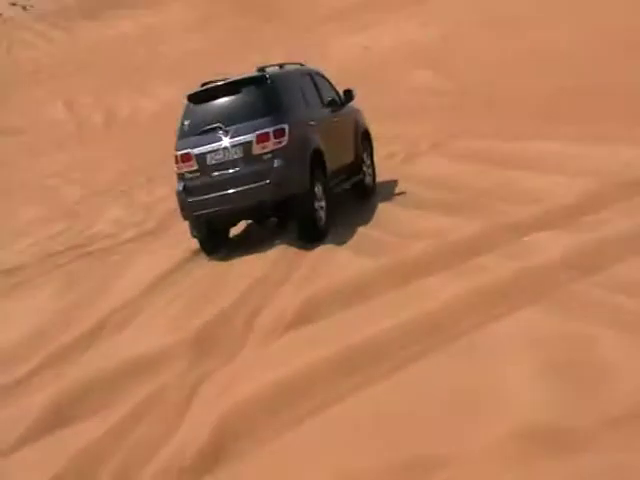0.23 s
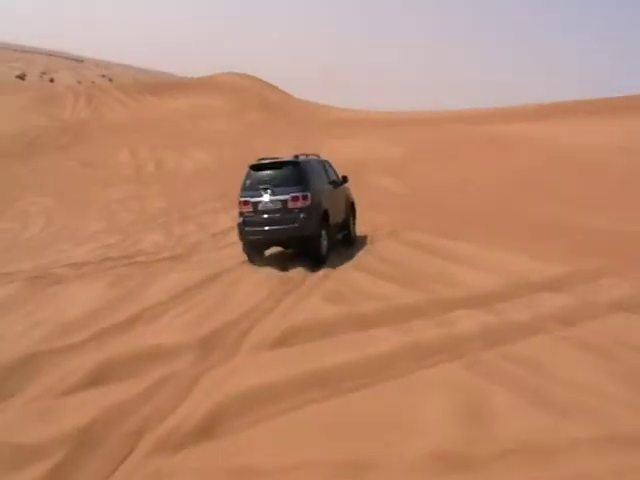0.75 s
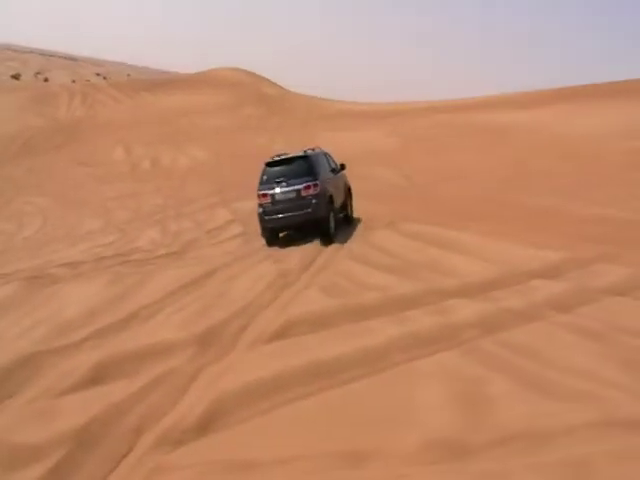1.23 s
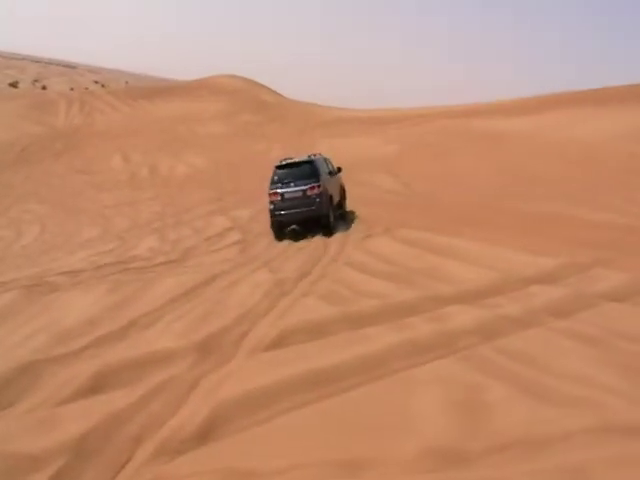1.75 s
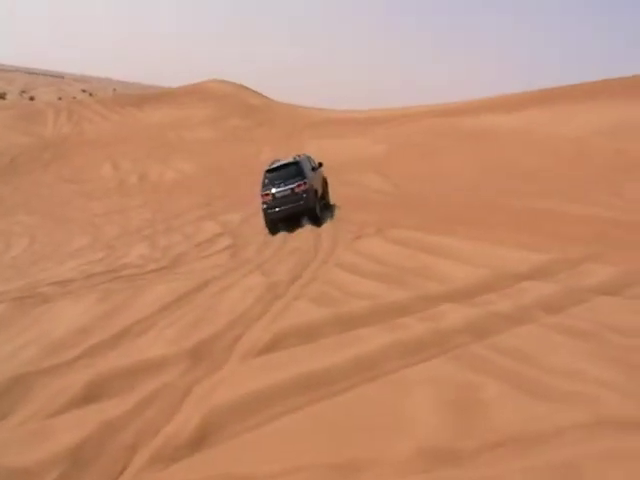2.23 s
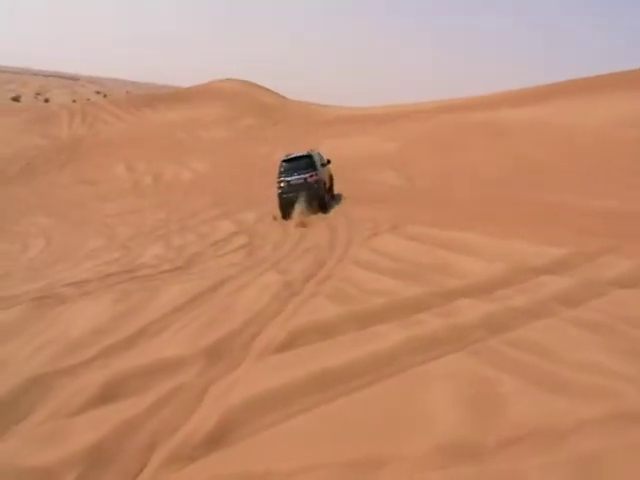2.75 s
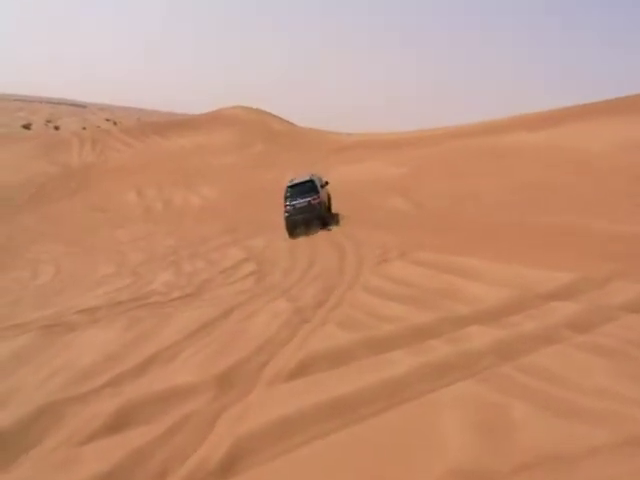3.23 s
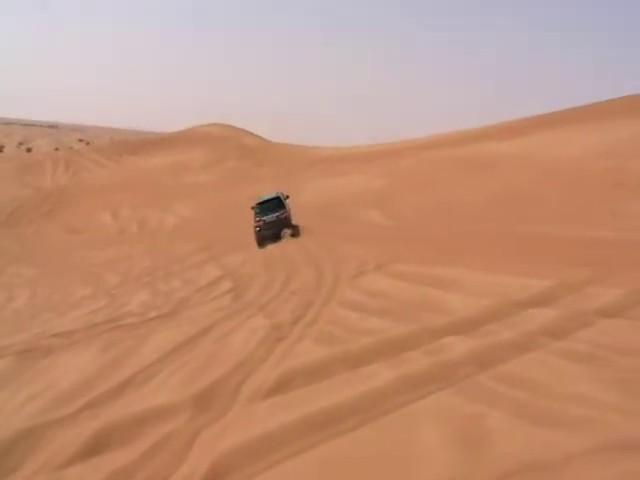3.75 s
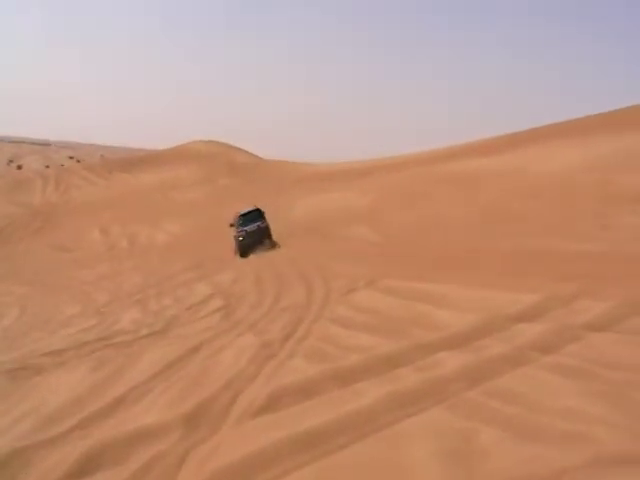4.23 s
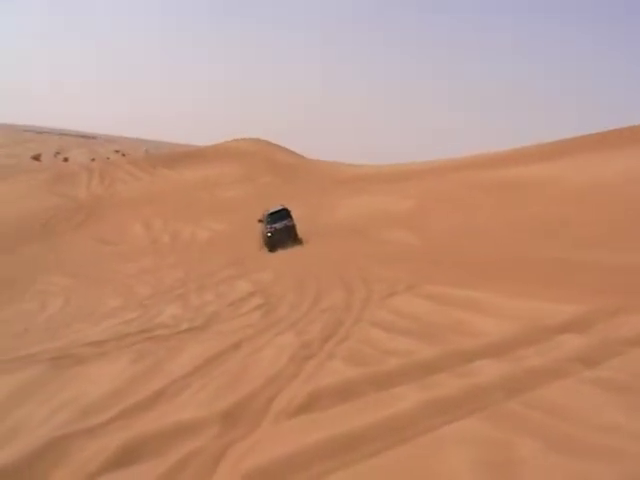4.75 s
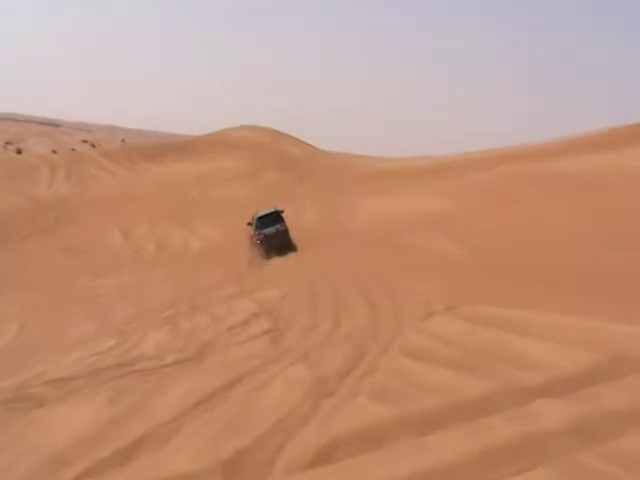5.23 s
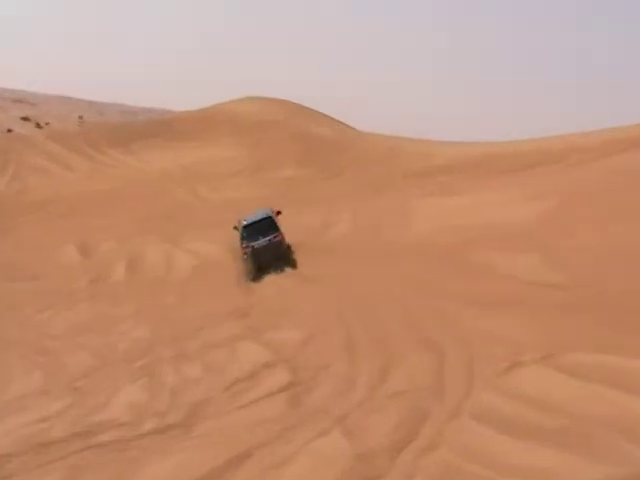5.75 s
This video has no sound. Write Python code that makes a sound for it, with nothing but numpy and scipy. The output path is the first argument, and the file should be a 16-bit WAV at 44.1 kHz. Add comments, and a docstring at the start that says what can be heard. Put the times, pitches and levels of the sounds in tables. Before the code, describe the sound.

A four-cylinder SUV drives away over open dunes, recorded close behind in stereo with no echo. Its low exhaust drone starts under throttle and sinks, catches with a few thumping coughs, then climbs to a hard, raspy pull. It lifts off with a burble and ends labouring at lower revs. Tyres churn sand with a bright hissing spray that fades and turns hollow with distance.

```python
"""A four-cylinder SUV drives away over soft dunes, in open desert with no echo.
It starts with the throttle down and eases off; soon it pulls hard, lifts off, then labours on at lower revs.
Each firing feeds the exhaust, which drones under load and burbles when the throttle opens or shuts.
All along, shaped noise makes tyres churn sand and throw hissing spray with each wheelspin, fading with distance.
Now and then a thin, high squeak, a short gliding tone, comes through."""
import sys
import numpy as np
from scipy import signal
from scipy.fft import rfft, irfft, next_fast_len
from scipy.io import wavfile
from scipy.ndimage import uniform_filter1d, map_coordinates

SR = 44100
rng = np.random.default_rng(int(sys.argv[2]) if len(sys.argv) > 2 else 0)


def transcribe(signal):
    """Save signal, clipped to [-1, 1], as a 16-bit WAV file at the path in sys.argv[1]."""
    frames = np.atleast_2d(signal).T
    limited = np.clip(frames, -1, 1)
    pcm = np.round(limited * 32767).astype(np.int16)
    wavfile.write(sys.argv[1], SR, pcm)


N = 264600

# Engine speed. Each row: time in seconds, crankshaft speed in turns a second.
REVS = [(0.0, 44.81), (0.26, 42.89), (0.44, 40.33), (0.6, 40.07), (0.82, 37.03), (1.24, 33.27),
        (1.6, 42.67), (1.7, 43.09), (2.2, 47.93), (2.39, 47.42), (2.65, 49.12), (3.78, 56.21), (3.86, 54.8),
        (4.3, 54.39), (4.6, 51.53), (5.2, 38.81), (5.41, 41.22), (6.0, 40.74)]
# Presses of the throttle. Each row: pressed in seconds, lifted in seconds, boost of the firing tone in dB,
# its sag in dB a second, boost of the higher orders in dB, surge of gas in dB.
THROTTLE = [(-.3, 0.659, 18.5, 10.5, 7, 0.5), (1.185, 3.75, 21, 0.2, 16.5, 7),
            (4.54, 6.5, 10.5, 2, 8.5, -3)]
# after a press the firing tone builds up, then the higher orders; after a lift all die back
BITE_S, OPEN_S, RELEASE_S = 0.19, 0.32, 0.35
# An order is a tone at so many cycles per crankshaft turn. The second is the firing tone.
FIRING_DB = -34  # at the source, throttle shut
# Strong orders at the source, throttle shut.
# Each row: crank order, level in dB, share of the higher orders' boost that it takes.
ORDERS_SHUT = [(3, -33, 0.79), (4, -29.5, 0.93), (6, -41, 0.99)]
# Fifth order, which swells in a pipe resonance. Each row: frequency in Hz, level in dB relative to the third.
FIFTH_ORDER = [(215, -18), (242, -9.5), (280, -12.5)]
# Weak overtones. Each row: crank order, level in dB on top of the brightness worked out in drone().
OVERTONES = [(7, -25.5), (8, -24.5), (9, -40), (10, -31), (11, -32.5), (12, -33), (13, -36), (14, -37),
             (16, -40.5), (18, -39.5)]
# Resonances of the exhaust pipe, which the orders sweep through. Each row: frequency in Hz, gain in dB.
PIPE = [(68, 3.5), (83, 3), (92, 4), (100, -2), (112, -0.6), (124, -5), (162, 3.5), (178, -1), (190, 0.5),
        (203, -1), (214, -9), (226, -3.5), (240, -4.5), (248, 3.5), (260, 5), (298, -2.5), (315, 0),
        (335, -2)]
# Single hard firings as the engine catches again. Each row: time in seconds, peak level in dB.
COUGHS = [(1.18, -16.5), (1.212, -18), (1.339, -17.5), (4.424, -19), (4.594, -20.5), (4.642, -20.5),
          (4.655, -22.5), (4.670, -14), (4.711, -28.5)]

# Times when the wheels spin and dig in.
# Each row: start in seconds, end in seconds, extra churn in dB, extra spray in dB.
WHEELSPINS = [(-.3, 0.44, 0.5, 0), (0.696, 1.408, 1.5, 3), (2.146, 2.95, 4, 2.5), (2.946, 3.8, 3, 1.5),
              (4.013, 5.072, 3, 3)]
SPIN_RAMP_S, SING_RAMP_S = 0.12, 0.13
# Narrow bands that sing in the hiss; one that ends before it starts stays silent.
# Each row: start in seconds, end in seconds, centre in Hz, distance from centre to half amplitude in Hz,
# level in dB relative to the churned sand, before its random swell.
SINGING = [(-.2, 1.2, 296, 16, 5), (-.2, 3, 469.5, 19, -0.5), (-.2, .7, 3020, 80, -13.5),
           (-.2, 1.45, 2530, 130, -10.5), (-.2, 3, 6470, 50, -22.5), (1, 1.4, 7830, 79, -19),
           (1.752, 3.0, 7880, 160, -22), (2.0, 3.2, 3650, 14, -19.5), (2.3, 6.2, 1124, 130, -12.5),
           (3.9, 3.7, 2480, 90, -8), (5.05, 5.4, 2850, 130, -7.5)]
# Thin gliding tones.
# Each row: start in seconds, length in seconds, first and last frequency in Hz before wavering, peak in dB.
SQUEAKS = [(1.369, 0.033, 6300, 6750, -50), (3.61, .036, 6270, 6850, -45.5),
           (3.888, 0.012, 6150, 6700, -45.5), (4.017, .028, 6280, 6080, -52),
           (4.464, 0.026, 6100, 6550, -42.5)]

# Noise colours, of which only the shape counts. Each row: frequency in Hz, level in dB per Hz.
SILENCER_COLOUR = [(25, -30.5), (52, -24), (75, -9), (110, -4.5), (165, -1), (230, -1.5), (310, -6.5),
                   (380, -15.5), (600, -51.5), (1200, -100)]
GAS_COLOUR = [(150, -43), (280, -1), (390, 0.5), (480, -0.5), (580, -7.5), (760, -7), (1000, -13),
              (1500, -23.5), (3000, -36), (8000, -72.5)]
INTAKE_COLOUR = [(2800, -28), (4000, -2.5), (5200, -4), (6200, -6.5), (8000, -18), (12000, -38.5)]
CHURN_COLOUR = [(300, -16.5), (700, -7), (1200, 5.5), (1800, 1), (2600, -1), (3400, -4.5), (4600, -14),
                (7000, -24.5), (14000, -56.5)]
SPRAY_COLOUR = [(1500, -25.5), (3500, -4.5), (4700, -7), (6500, -0.5), (7200, -0.5), (7900, 0),
                (9000, -3.5), (11000, -8.5), (13000, -15), (15500, -19)]
# Filters for the far sand and for the air. Each row: frequency in Hz, gain in dB.
FAR_SAND = [(1500, -2.0), (2000, 3.5), (3000, 0.0), (4200, 2), (5700, 5.0), (7500, 0.0), (10000, -6.0), (14000, -7.5)]
AIR_COLOUR = [(15, -13.5), (45, -0.5), (90, -7.5), (300, -43.5)]
# How far the sand has turned to its far colour. Each row: time in seconds, share from 0 to 1.
FAR_SHARE = [(0, 0), (2.5, 0.21), (3.6, 0.82), (6, 0.8)]

# Likeness of left and right in the noises. Each row: frequency in Hz, correlation.
ALIKE = [(100, 0.93), (250, 1), (500, 0.98), (1000, 0.87), (4000, 0.77), (7000, 0.98), (12000, 0.75)]
# Difference in microphone colour. Each row: frequency in Hz, left minus right in dB.
LEAN = [(280, 0), (600, 1), (1300, 1), (2300, -0.5), (3200, -3.5), (5000, 2.1), (7000, 0), (9000, -2),
        (13000, 0.5)]
# Difference in microphone phase. Each row: frequency in Hz, radians by which left leads.
LEAD = [(80, 0.13), (200, 0.24), (650, 0.31), (1300, 0.044), (2800, 0), (4100, 0.22), (5500, .05),
        (10000, .12)]
TOP_HZ = 15700
START_M, AWAY_M_PER_S = 7.53, 1.8  # distance from the microphones, and how fast it grows


def amp(db):
    """Turn decibels into gain."""
    return 10 ** (np.asarray(db) / 20)


def unit(x):
    """Scale x to rms 1."""
    return x / np.sqrt(np.mean(x ** 2) + 1e-20)


def along(points, hz):
    """Read a table of frequencies and values on a log frequency axis."""
    f, v = np.transpose(points)
    return np.interp(np.log(hz + 1), np.log(f + 1), v)


def curves(rows):
    """Give one value per sample for each column after the time."""
    s, *columns = np.transpose(rows)
    return [np.interp(np.arange(N) / SR, s, column) for column in columns]


def ramp(start, end, rise, fall):
    """Go from 0 to 1 and back: rise from start, be gone at end."""
    t = np.arange(N) / SR
    return np.clip(np.minimum((t - start) / rise, (end - t) / fall), 0, 1)


def wobble(rate):
    """Draw a smooth random curve through rate random points a second."""
    points = rng.standard_normal(int(N * rate / SR) + 4)
    return map_coordinates(points, [np.arange(N) * rate / SR])


def filtered(x, response):
    """Multiply the spectrum of x by a response that depends on frequency."""
    size = next_fast_len(N + SR // 2)
    hz = np.fft.rfftfreq(size, 1 / SR)
    return irfft(rfft(x, size) * response(hz), size)[..., :N]


def patchy_noise(patchy_db):
    """Make two noises that share drifting patches of random gain in time and frequency."""
    z = signal.stft(rng.standard_normal((2, N)), nperseg=512)[2]
    field = uniform_filter1d(rng.standard_normal(z.shape[1:]), size=5, axis=0)
    field = uniform_filter1d(field, size=18, axis=1)
    return signal.istft(z * amp(patchy_db * unit(field)), nperseg=512)[1][:, :N]


def coloured(pair, spectrum):
    """Turn two unrelated signals into a stereo sound of rms 1 with this spectrum."""
    def mid_and_side(hz):
        # the angle that gives left and right the wanted correlation
        turn = np.arccos(np.clip(along(ALIKE, hz), -1, 1)) / 2
        return amp(along(spectrum, hz)) * [np.cos(turn), np.sin(turn)]

    mid, side = filtered(pair, mid_and_side)
    return unit(np.array([mid + side, mid - side]))


def crank_angle(flutter=0.002):
    """The crankshaft's angle in radians; its speed is never quite even."""
    speed, = curves(REVS)
    return 2 * np.pi * np.cumsum(speed * (1 + flutter * wobble(25))) / SR


def revs_db():
    """Engine speed in dB around its mean."""
    speed, = curves(REVS)
    return 20 * np.log10(speed / speed.mean())


def load():
    """Boost in dB of the firing tone and of the higher orders while the throttle is down."""
    t, firing, higher = np.arange(N) / SR, 0, 0
    for press, lift, firing_db, sag, higher_db, _ in THROTTLE:
        sagging_db = firing_db - sag * (t - press)
        firing = firing + sagging_db * ramp(press, lift + RELEASE_S, BITE_S, RELEASE_S)
        higher = higher + higher_db * ramp(press, lift + RELEASE_S, OPEN_S, RELEASE_S)
    return firing, higher


def distance_db():
    """Spreading loss as the vehicle drives away."""
    return -20 * np.log10(1 + AWAY_M_PER_S * np.arange(N) / SR / START_M)


def drone(angle, shimmer_db=0.28, overtone_shimmer_db=2, skew=0.7, odd_lag=0.92, rasp=0.47, mellow_db=7):
    """Two firings a turn give the even orders; unequal cylinders add the odd ones."""
    speed, = curves(REVS)
    boost_db, higher_db = load()
    at_source = [(2, FIRING_DB + boost_db)]
    at_source += [(k, db + share * higher_db) for k, db, share in ORDERS_SHUT]
    strong = [(k, db + along(PIPE, k * speed) + distance_db()) for k, db in at_source]
    (_, firing_db), (_, third_db), *_ = strong
    strong.append((5, third_db + along(FIFTH_ORDER, 5 * speed)))
    # pressure jumps at each firing and sags after it: skew, in radians
    # unequal manifold branches delay the odd orders: odd_lag, in radians
    tone = 0
    for k, db in strong:
        phase = k * angle + skew - odd_lag * (k % 2)
        tone = tone + amp(db + shimmer_db * k / 2 * wobble(30)) * np.cos(phase)
    # a harder press brings out the overtones; at high revs they climb further into the silencer's stop band
    stop_band_db = np.interp(speed, [43, 53], [0, -3])
    bright_db = firing_db + rasp * higher_db - mellow_db + stop_band_db
    for k, db in OVERTONES:
        drift = rng.uniform(0, 2 * np.pi) + 0.034 * k * wobble(25)
        tone += amp(bright_db + db + overtone_shimmer_db * wobble(14)) * np.cos(k * angle + drift)
    return -np.sqrt(2) * tone  # root 2 makes the levels rms


def burble(angle, turbulence=1.0, level_db=-31.5, fade=1.17, strain=0.31,
           catch_db=7, overrun_db=5, catch_s=0.25, overrun_s=0.67):
    """Uneven firings boom in the silencer, most as the throttle opens or shuts and pulling at high revs."""
    stumble_db = 0
    for press, lift, *_ in THROTTLE:
        stumble_db = stumble_db + catch_db * ramp(press, press + catch_s, catch_s / 2, catch_s / 2)
        stumble_db = stumble_db + overrun_db * ramp(lift, lift + overrun_s, overrun_s / 2, overrun_s / 2)
    strain_db = strain * load()[1] * np.maximum(revs_db(), 0)
    # one click every half turn, each of random strength, over steady noise
    fires = np.diff(np.floor(angle / np.pi), prepend=0)
    kicks = unit(fires * rng.standard_normal((2, N))) + turbulence * rng.standard_normal((2, N))
    gain = amp(level_db + fade * distance_db() + strain_db + stumble_db)
    return gain * coloured(kicks, SILENCER_COLOUR)


def coughs(boom_hz=160, width_s=0.0042):
    """A hard firing is one brief boom of the silencer."""
    t, out = np.arange(N) / SR, np.zeros(N)
    for s, db in COUGHS:
        bump = np.exp(-((t - s) / width_s) ** 2)
        out -= amp(db) * bump * np.cos(2 * np.pi * boom_hz * (t - s))
    return out


def gas(angle, level_db=-33.5, puff_db=2, fade=1.54, load_share=0.063, revs_share=0.99, surge_s=0.8):
    """Tailpipe gas puffs once per firing, grows with load and revs, and changes level after each press."""
    puffs = amp(puff_db * np.cos(2 * angle))
    surge_db = sum(db * ramp(press, press + surge_s, surge_s / 2, surge_s / 2) for press, *_, db in THROTTLE)
    flow_db = load_share * load()[1] + revs_share * revs_db() + surge_db
    gain = amp(level_db + fade * distance_db() + flow_db)
    return gain * coloured(puffs * patchy_noise(patchy_db=1), GAS_COLOUR)


def intake(level_db=-78, hiss_s=1.3, rise_s=0.25, fall_s=0.4):
    """Air hisses into the engine after each press, louder the harder the press."""
    gulp = 0
    for press, _, boost_db, *_ in THROTTLE:
        gulp = gulp + amp(boost_db) * ramp(press, press + hiss_s, rise_s, fall_s)
    return amp(level_db + distance_db()) * gulp * coloured(patchy_noise(patchy_db=1), INTAKE_COLOUR)


def tyres(churn_db=-43.5, spray_db=-53.5, churn_fade=1.455, spray_fade=1.21):
    """Levels in dB of churn and spray: they fade with distance and rise with wheelspin."""
    churn = churn_db + churn_fade * distance_db()
    spray = spray_db + spray_fade * distance_db()
    for start, end, dig_db, fling_db in WHEELSPINS:
        spin = ramp(start, end, SPIN_RAMP_S, SPIN_RAMP_S)
        churn, spray = churn + dig_db * spin, spray + fling_db * spin
    return churn, spray


def sand(grain_db=1.4, clump_db=0.7):
    """Tyres grind through the sand and fling clumps of grains that hiss as they land."""
    churn_db, spray_db = tyres()
    churn = amp(churn_db) * coloured(patchy_noise(patchy_db=1.0), CHURN_COLOUR)
    # fast flicker for grains, slower for clumps
    flicker = amp(grain_db * wobble(3000) + clump_db * wobble(60))
    grains = patchy_noise(patchy_db=1.75) * flicker
    near = churn + amp(spray_db) * coloured(grains, SPRAY_COLOUR)
    # as the vehicle draws away the hiss turns hollow and loses its finest fizz
    far = filtered(near, lambda hz: amp(along(FAR_SAND, hz)))
    far_share, = curves(FAR_SHARE)
    return (1 - far_share) * near + far_share * far


def singing(swell_db=2.0):
    """Faint whistling bands of noise come and go, as loud as the churning of the sand allows."""
    out = np.zeros(N)
    for start, end, centre, width, db in SINGING:
        band = filtered(rng.standard_normal(N), lambda hz: 1 / (1 + ((hz - centre) / width) ** 2))
        gain = amp(db + swell_db * wobble(5)) * ramp(start, end, SING_RAMP_S, SING_RAMP_S)
        out += gain * unit(band)
    return out * amp(tyres()[0])


def squeaks(waver=0.0094):
    """Short, thin tones that glide and waver in pitch."""
    t, out = np.arange(N) / SR, np.zeros(N)
    unsteady = 1 + waver * wobble(400)
    for s, length, start_hz, end_hz, db in SQUEAKS:
        progress = np.clip((t - s) / length, 0, 1)
        hz = (start_hz + (end_hz - start_hz) * progress) * unsteady
        out += amp(db) * np.sin(np.pi * progress) * np.sin(2 * np.pi * np.cumsum(hz) / SR)
    return out


def air(level_db=-61):
    """A faint rumble of moving air on the microphones."""
    rumble = filtered(rng.standard_normal(N), lambda hz: amp(along(AIR_COLOUR, hz)))
    return amp(level_db) * unit(rumble)


def scene():
    """Engine and sand, nearly straight ahead, with the air behind them."""
    angle = crank_angle()
    engine = drone(angle) + burble(angle) + coughs() + gas(angle) + intake()
    return engine + sand() + singing() + squeaks() + air()


def record(dry):
    """The two microphones differ slightly in colour and phase; nothing is kept above the band limit."""
    def microphones(hz):
        left_over_right = amp(along(LEAN, hz)) * np.exp(1j * along(LEAD, hz))
        # half of the difference goes to each side
        return left_over_right ** np.array([[0.5], [-0.5]]) * (hz < TOP_HZ)

    return filtered(dry, microphones)


dry = scene()
out = record(dry)
transcribe(out)
```